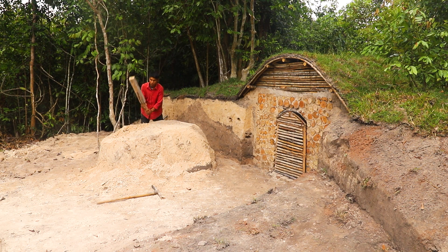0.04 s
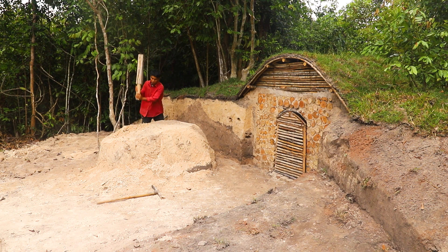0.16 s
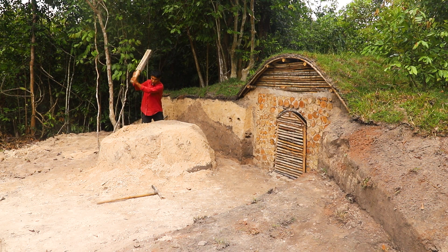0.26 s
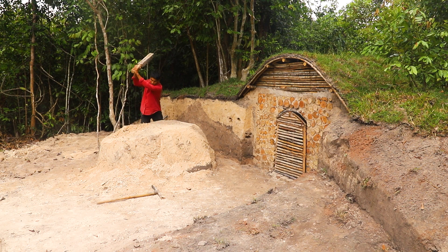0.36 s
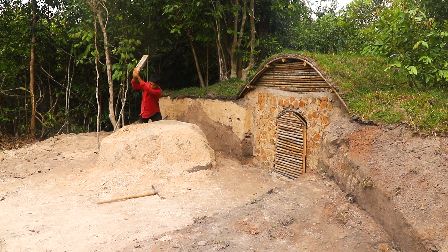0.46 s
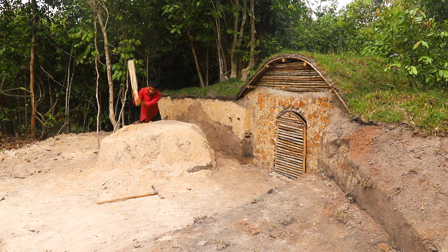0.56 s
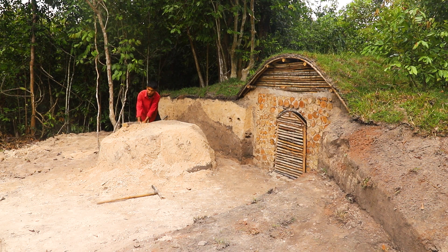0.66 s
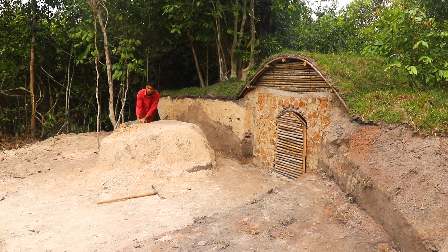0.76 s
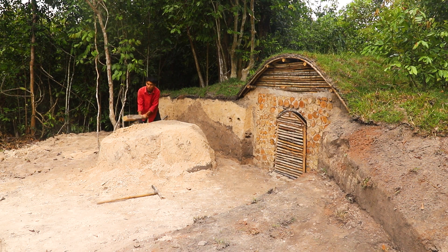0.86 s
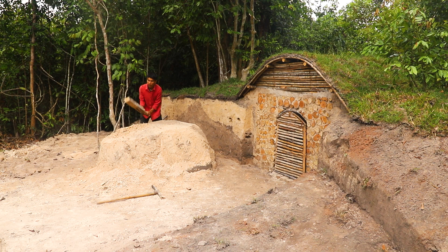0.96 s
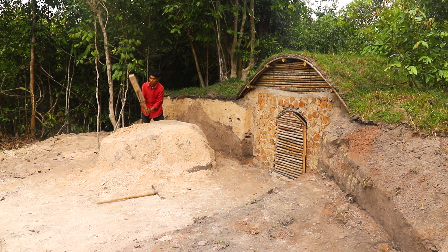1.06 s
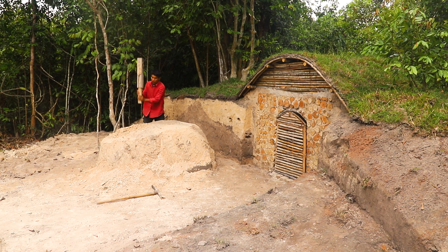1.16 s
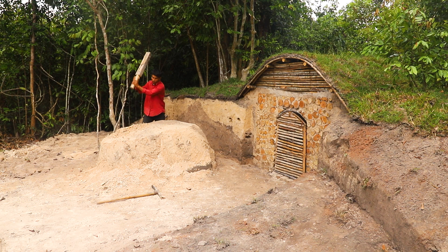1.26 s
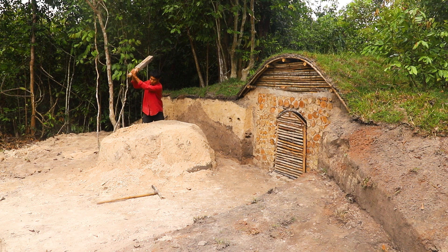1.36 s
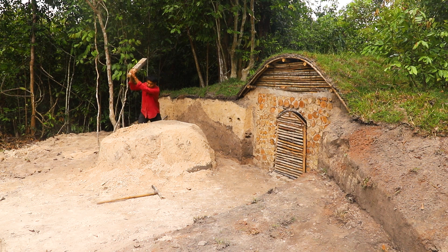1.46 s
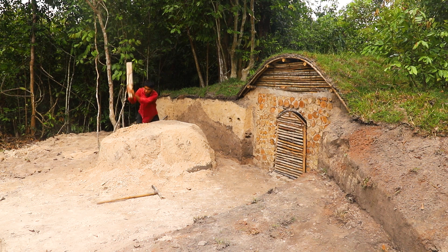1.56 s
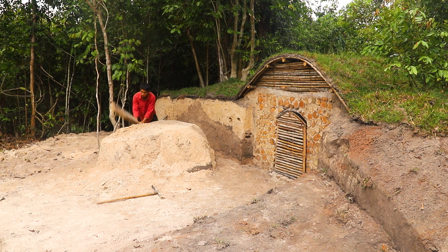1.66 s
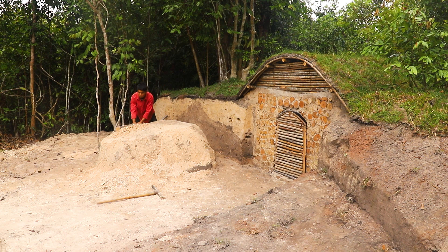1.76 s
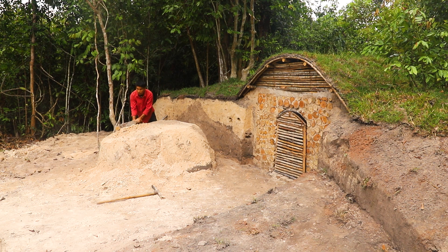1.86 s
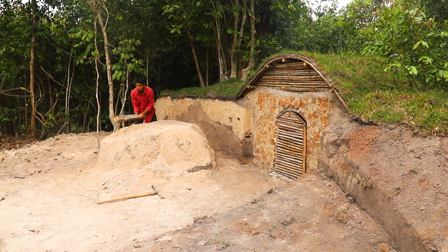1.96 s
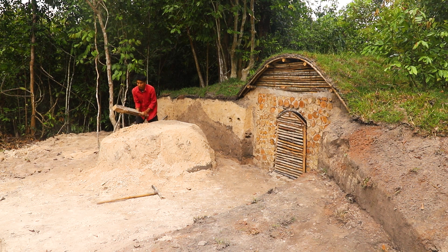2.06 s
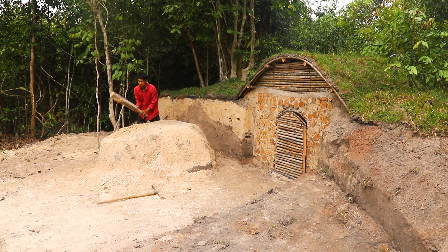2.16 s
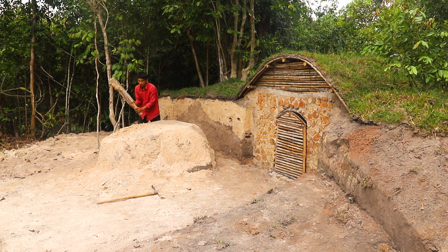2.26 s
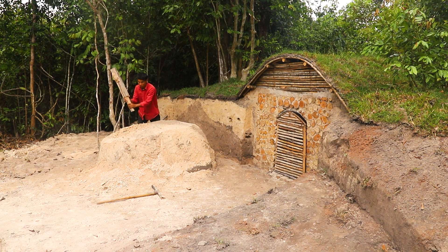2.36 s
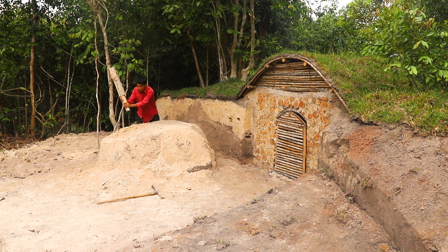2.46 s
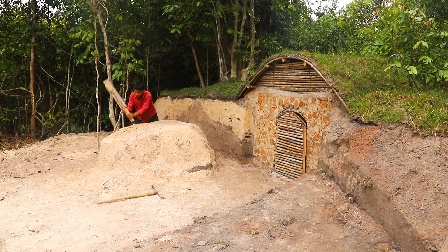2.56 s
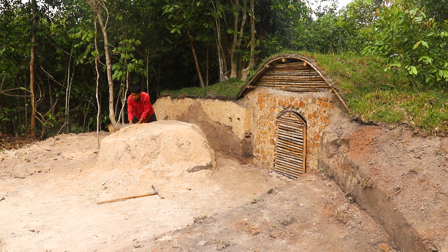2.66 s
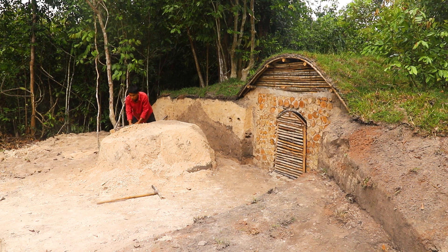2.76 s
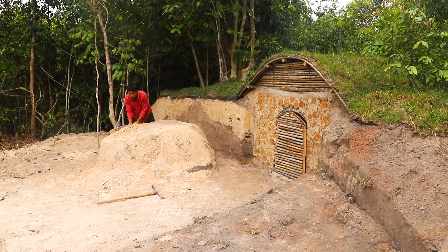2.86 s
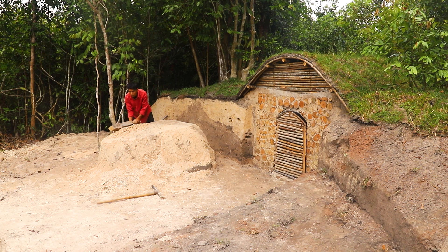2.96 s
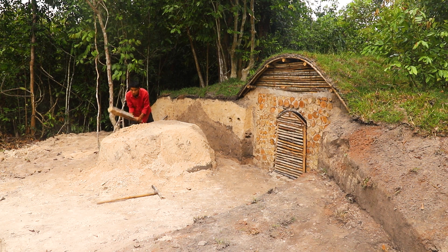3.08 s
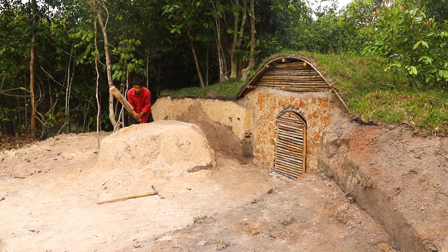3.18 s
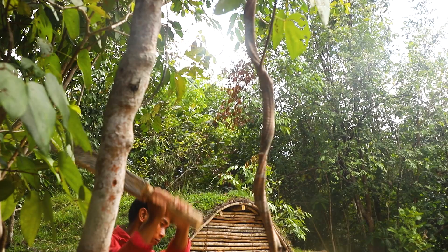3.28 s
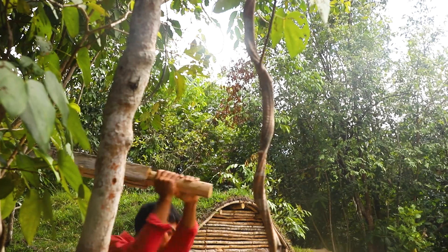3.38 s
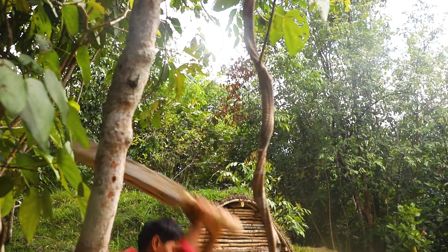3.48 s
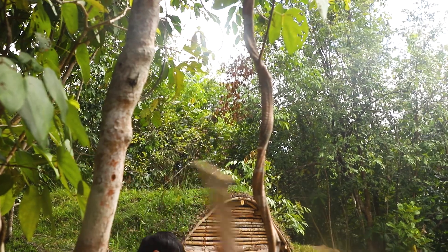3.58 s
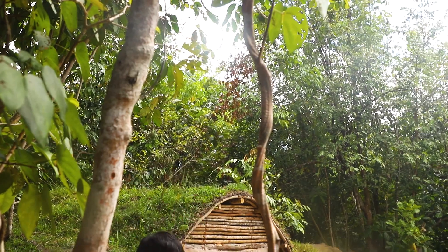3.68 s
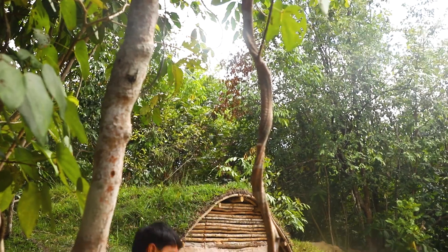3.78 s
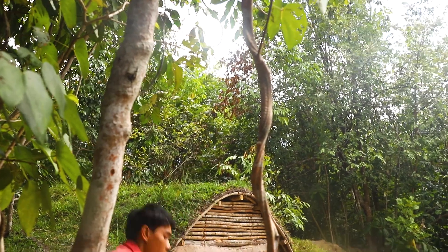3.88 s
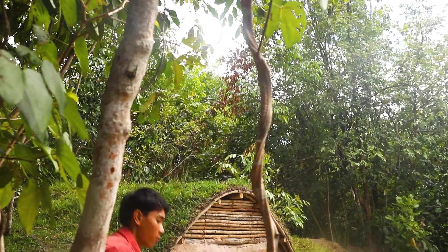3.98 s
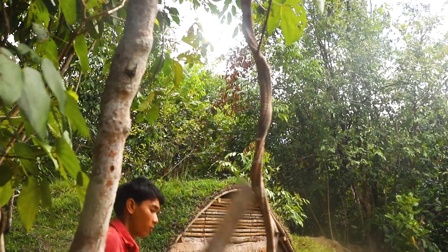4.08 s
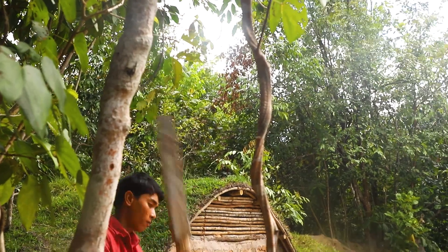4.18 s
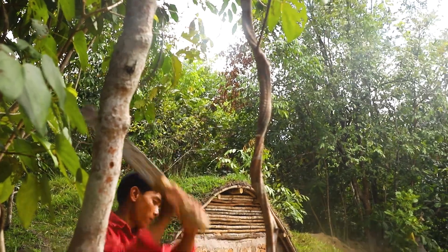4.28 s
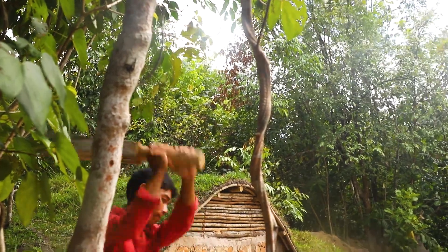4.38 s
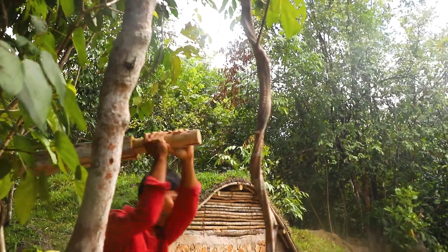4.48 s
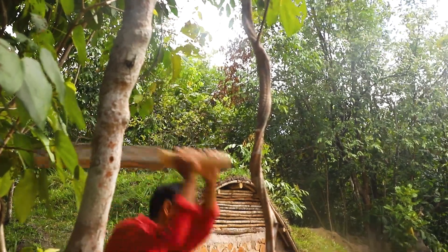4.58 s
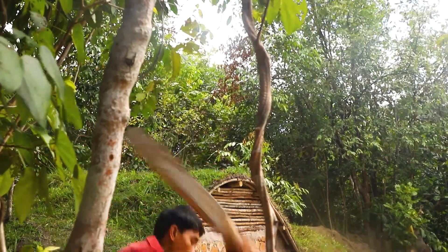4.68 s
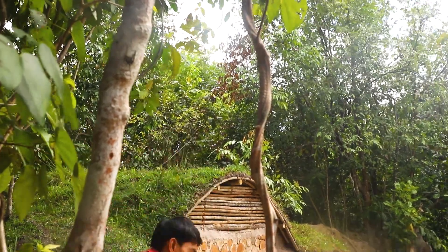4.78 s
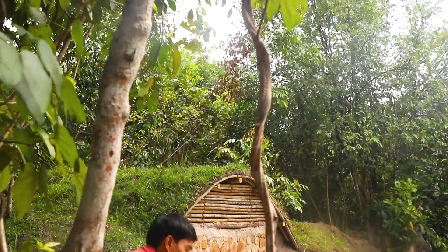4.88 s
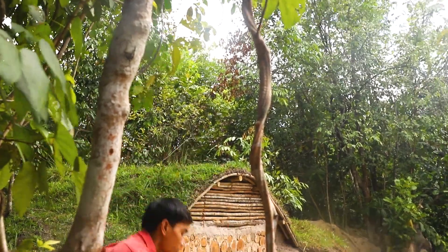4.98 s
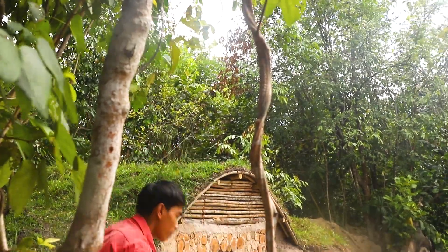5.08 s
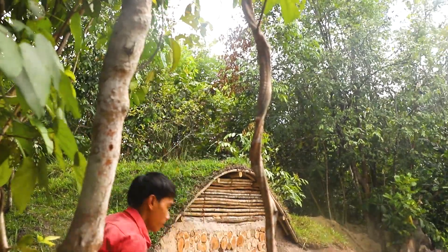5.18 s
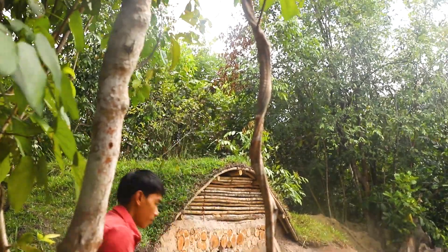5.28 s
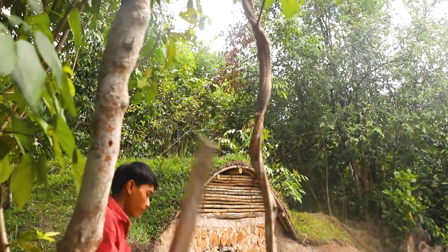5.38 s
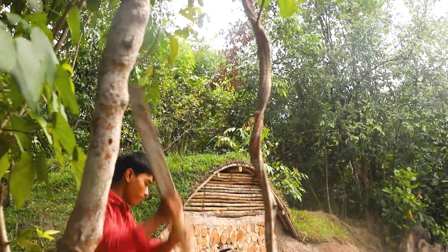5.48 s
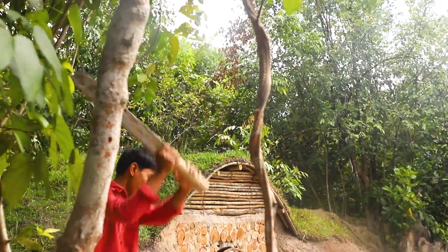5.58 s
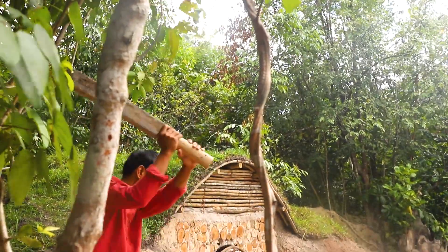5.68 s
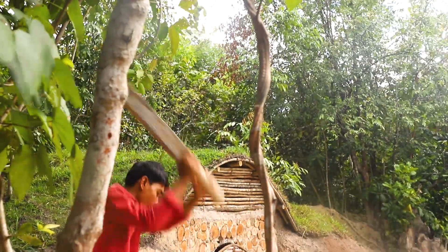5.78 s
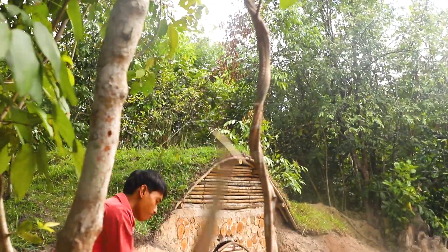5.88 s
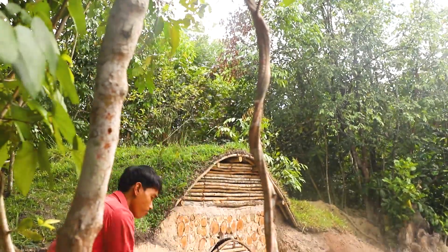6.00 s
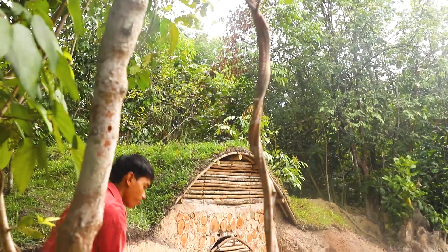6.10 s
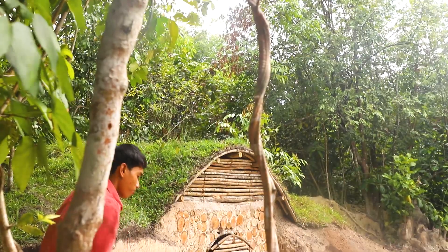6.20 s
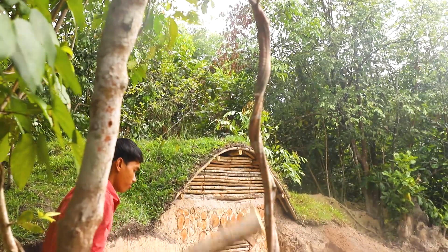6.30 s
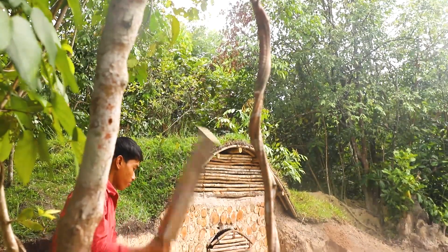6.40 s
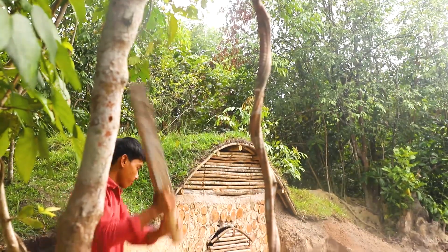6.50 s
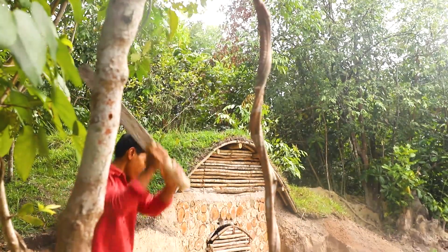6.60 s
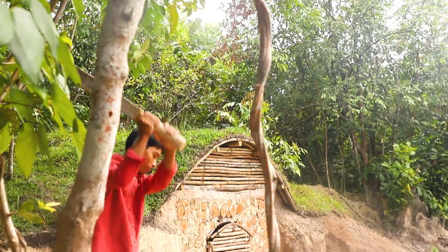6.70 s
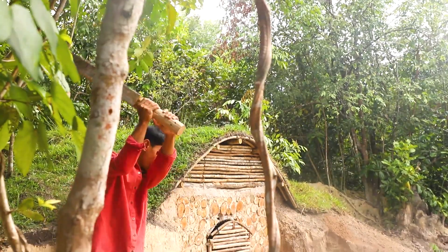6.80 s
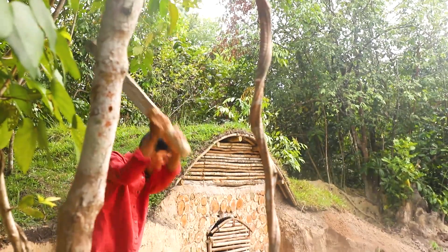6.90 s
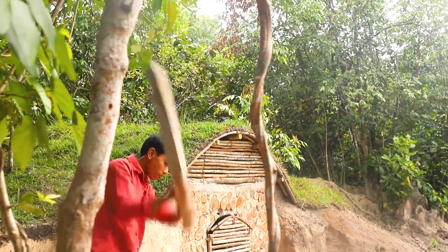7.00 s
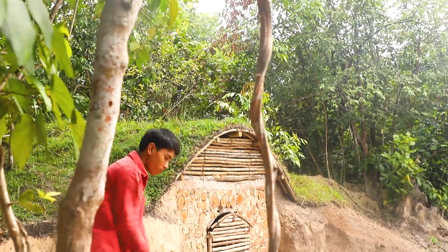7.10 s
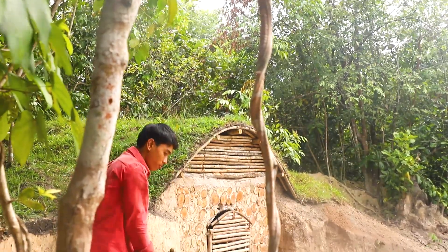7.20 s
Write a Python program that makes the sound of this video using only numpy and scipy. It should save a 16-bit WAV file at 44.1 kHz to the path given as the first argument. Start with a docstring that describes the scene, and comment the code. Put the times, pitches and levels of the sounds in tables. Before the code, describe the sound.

Steady manual pounding outdoors: dry wooden slaps on compacted soil, each a few milliseconds of hard contact with a low ground thud and brief diffuse echo. Three blows come from afar over very quiet foliage, getting softer; then four come from nearby, brighter and overloading the microphone. Leaves hiss slightly more, a faint high insect tone fades, tiny knocks and gritty scuffs appear, and wind bumps the microphone, mostly on the left.

```python
"""A forest clearing: a flat wooden pole slaps packed earth, heard first from afar, then from close by.
Each blow is a few ms of uneven contact that rings pole, earth and trapped air; loud blows overload.
Low noise bands make the thud of the ground, and decaying coloured noise the echoes off banks and trees.
Broadband noise makes hissing leaves and scuffed soil, narrow resonances a faint insect, rung bursts small knocks.
Low noise and short sine puffs are gusts of wind buffeting the two microphone ports."""
import sys
import numpy as np
from scipy import signal
from scipy.fft import rfft, irfft
from scipy.io import wavfile

SR = 44100
rng = np.random.default_rng(int(sys.argv[2]) if len(sys.argv) > 2 else 0)


def unload_audio(sound):
    """Save the sound as a 16-bit wav file, at the path given as the first command line argument."""
    columns = np.transpose(np.atleast_2d(sound))
    # keep every value between -1 and 1, then stretch to whole-number steps
    steps = np.round(np.clip(columns, -1, 1) * 32767)
    wavfile.write(sys.argv[1], SR, steps.astype(np.int16))


N = 319725
TIME_S = np.arange(N) / SR
BLOW_SIZE = SR // 2
BLOW_TIME_S = np.arange(BLOW_SIZE) / SR

# Leaf hiss spectra from the far and near standpoints, and high rustle: frequency_hz, density_db (per Hz)
FAR_LEAVES = [(15, -56.5), (25, -23), (53, -5), (76, -7), (92, -14.5), (154, -6), (311, -15.5), (442, -13),
              (739, -15.5), (1380, -19), (1710, -20.5), (12700, -31.5), (16200, -38)]
NEAR_LEAVES = [(15, -45), (25, -10), (43, -2.5), (80, -6.5), (180, 0.5), (256, -8.5), (326, -7),
               (476, -6.5), (695, -5.5), (1130, -9.5), (1230, -11.5), (2550, -12), (8590, -17),
               (14400, -23), (16000, -31)]
HIGH_RUSTLE = [(8000, -25), (11500, -6), (13500, -0.5), (16000, -3)]
# Left-right likeness of forest noise: frequency_hz, likeness (-1 opposite to 1 alike)
FOREST_LIKENESS = [(60, 0.72), (130, -0.23), (290, -0.24), (640, -0.3), (1410, 0.51), (3100, 0.36),
                   (6820, 0.52), (15000, -0.63)]
# Swells of the breeze: height_s, half_s (time to half the gain in dB), near_leaves_gain_db, rustle_gain_db
BREEZE_SWELLS = [(5.8, 1.6, 4, 5), (5.72, .12, 0.3, 9)]
# Gusts on the ports: peak_s, rms_db, rise_s and fall_s (per 20 dB), left_minus_right_db, top_hz
GUSTS = [(4.756, -40.5, 0.077, 0.095, 8, 179), (5.125, -44.5, 0.1, 0.098, 0.5, 180.5),
         (5.273, -46.5, 0.028, 0.068, -12, 231.3), (5.595, -31, 0.079, .15, 11, 173),
         (5.702, -22, 0.051, 0.036, 21, 251), (5.789, -34, 0.074, 0.015, 1, 283),
         (5.859, -35.5, .03, .12, 6, 340), (5.935, -30.5, 0.08, 0.037, 3.5, 348),
         (6.361, -51.5, 0.15, .1, 4, 180), (6.49, -40, 0.075, 0.086, 8.5, 190),
         (6.54, -35.5, 0.026, 0.067, 4, 185.4), (6.67, -34, .02, .3, 7.5, 200),
         (6.831, -42.5, .03, 0.16, 8, 200), (6.985, -29.5, .025, .15, -4, 197),
         (7.05, -34.5, 0.056, 0.085, 9, 437), (7.12, -39.5, 0.13, 0.1, 5, 396)]
# Single puffs: middle_s, peak_db, left_minus_right_db, pitch_hz
PUFFS = [(4.753, -36.5, 11, 94.3), (5.271, -42.5, -20, 160.3), (5.593, -20.5, 14.5, 138),
         (5.622, -24.5, 16, 164), (5.652, -41, 14, 275), (5.693, -19.5, 23, 151), (5.701, -18.5, 5, 70),
         (5.706, -19.5, 30, 375), (5.753, -22.5, 11.5, 286), (5.789, -33, 13, 347.5), (5.83, -32, -7, 322),
         (5.863, -31, 5, 230), (5.921, -46, 3, 393), (5.938, -26.5, 11, 219), (6.493, -27, 4, 140),
         (6.672, -23.5, 8, 169), (6.831, -27.5, 8, 173.3), (6.987, -24, -6.5, 190), (7.022, -22, 4.5, 248),
         (7.031, -29, 9, 486), (7.053, -25, 9, 422), (7.059, -23, 4, 184), (7.094, -22.5, 0, 198),
         (7.12, -21, 0.5, 155), (7.15, -24.5, 4, 253)]
# Scuffs on dry soil: peak_s, rms_db, fall_s (per 20 dB)
SCUFFS = [(3.38, -59, .3), (3.478, -59, .18), (6.39, -57, .03), (6.45, -65, .2)]
# Spectrum of the scuffs: frequency_hz, density_db (per Hz)
SCUFF_SPECTRUM = [(1000, -17), (3000, -7.5), (5000, -2), (8000, -8.5), (14000, -15.5)]
# Small ticks and knocks: start_s, peak_db, pitch_hz, burst_t60_s
TICKS = [(0.336, -50, 12000, .004), (1.07, -58.5, 12000, .004), (1.455, -52, 155, 0.17),
         (3.485, -51.5, 765, 0.22), (5.395, -47, 1585, 0.036), (5.879, -45, 7400, 0.0074),
         (5.939, -45.5, 1525, 0.049), (6.6337, -33.5, 2670, 0.015), (6.645, -49.5, 2820, 0.11)]
# Ground rumble bands: low_hz, high_hz, level_db (before tilt), silent_s (60 dB down after a 0 dB blow)
THUD_BANDS = [(35, 110, -12.5, 0.41), (55.5, 75, -5.5, 0.2063), (110, 220, -5, 0.28),
              (220, 610, -8.5, 0.2738)]
# Spectrum of echoes and crack before tilt: frequency_hz, density_db (per Hz)
ECHO_SPECTRUM = [(88, -27.5), (150, -0.5), (406, -5.5), (555, -7), (805, -8), (1360, -7), (1480, -5.5),
                 (1720, -7), (6140, -12), (13400, -31.5), (16000, -44.5)]
# Left-right likeness of the echoes and of the crack: frequency_hz, likeness (-1 to 1)
ECHO_LIKENESS = [(60, 1), (130, 0.5), (290, 0.091), (640, 1), (1410, -0.11), (3100, -0.32), (6820, -0.32),
                 (15000, 0.33)]
CRACK_LIKENESS = [(300, 0), (2000, 0), (5000, 0), (10000, 0)]
# Resonant modes of the pole: pitch_hz, level_db (relative to the other modes), t60_s
POLE_MODES = [(435, -9.5, 0.0014), (555, -9.5, 0.0031), (660, -6.5, 0.008), (1030, -12, 0.0048),
              (1300, -11.5, 0.011), (1600, -11, 0.0088), (1770, -9, 0.0079), (2150, -12.5, 0.0077),
              (2760, -12.5, 0.0034), (3700, -14.5, .004), (4720, -13, 0.0019), (6000, -19.5, 0.0043)]
# Blows: start_s, peak_db, slap_hz, pocket_db, edge_hz, edge_db, earth_hz, earth_db, contact_ms, crack_db,
# thud_db, thud_tilt_db (per octave), echo_db, echo_tilt_db (per octave);
# pocket, edge, earth and crack levels are relative to the peak
BLOWS = [(0.7634, -1.5, 1009, 4.5, 2270, -6.5, 229, 0, 5.52, -12.5, -30.5, 2.5, -35.5, 2),
         (1.7952, -10.5, 1100, -1, 2420, -4.5, 140, -1.5, 7.2, -21, -29, -3.5, -37, -0.2),
         (2.7792, -16.5, 1460, -12, 2380, -3.5, 191.2, 5.5, 6.7, -14, -30.5, -5, -45.5, -0.5),
         (3.7742, 3.5, 652.6, 2.5, 1550, -4.5, 268.4, -4, 4.45, -11.5, -30.5, -1, -28.5, 4.5),
         (4.9228, 4, 629, -2.8, 1340, 0, 267, -5.5, 4.8, -5.5, -32.5, 1.5, -29.5, 2.37),
         (6.057, 0.5, 1254, 5.5, 2800, 2, 308, -17, 2.5, -5, -41.5, 3.5, -30, 4.1),
         (7.2223, 3, 1456, 3.8, 2415, -0.1, 498, -1.5, 3.67, -6, -23.5, -2.5, -31, 0.4)]
# Deep bass taken out over time: time_s, share (0 to 1)
BASS_CUT = [(5.75, 0.05), (5.77, 0.74), (7.19, 0.92), (7.22, 0.14)]

MOVE_S = 3.35   # the standpoint changes from far to near
FAR_DB, NEAR_DB, RUSTLE_DB = -63.5, -59.5, -81.5   # near leaves and rustle before the breeze
INSECT_LOW_HZ, INSECT_HIGH_HZ, INSECT_WIDTH_HZ = 8660, 8670, 30
INSECT_DB, INSECT_FADE_DB_PER_S = -76, 2.5   # level at MOVE_S
PUFF_OVERTONE, PUFF_OVERTONE_DB = 1.8, -9   # pitch ratio, relative level
SCUFF_RISE_S = .03   # per 20 dB
TICK_OVERTONE, TICK_OVERTONE_DB = 1.73, -10   # pitch ratio, relative level
LEFT_LEAD_MS, LEFT_DB = .0227, 3.3   # the slap is earlier and louder on the left
THUD_SIDE_DB = -12   # side relative to mid
EARLY_DB, EARLY_T60_S, ECHO_BEND = 9, 0.13, 3.7   # early echoes relative to late ones; exponent of late decay
RETURN_DB = -29   # returning slap, relative to the air pocket
# A harder blow snaps more, is brighter, and is echoed and rumbles for longer: values for a 0 dB blow,
# and the strength in dB over which a quantity doubles
SNAP_DB, SNAP_DB_PER_DB = -16, 2.1
TOP_HZ, TOP_DOUBLES_DB = 8000, 13.5
REACH_S, REACH_DOUBLES_DB = .135, 15   # late echoes are 10 dB down at their reach
THUD_DOUBLES_DB = 44.5
LANDING_MS, LANDING_HALVES_DB = 1.2, 9   # a harder blow lands flat sooner
BASS_CUT_HZ, RUMBLE_CUT_HZ, CUTOFF_HZ = 170, 40, 16300


def from_db(db):
    """A level in decibels is twenty times the logarithm of gain."""
    return 10 ** (np.asarray(db) / 20)


def rms_one(x):
    """Equal mean power gives rms 1."""
    return x / np.sqrt(np.mean(x ** 2) + 1e-20)


def at_hz(points, hz):
    """Spectra interpolate linearly along logarithmic frequency."""
    frequencies, values = np.transpose(points)
    return np.interp(np.log(hz), np.log(frequencies), values)


def drift(rate_hz):
    """Critically damped low-pass filtering turns white noise into a slow random wander of spread 1."""
    step = 40   # samples between computed points
    r = np.exp(-2 * np.pi * rate_hz * step / SR)
    white = rng.standard_normal(N // step + 2002)
    slow = signal.lfilter([1], [1, -2 * r, r * r], white)[2000:]   # drop the filter's start
    return np.interp(np.arange(N) / step, np.arange(len(slow)), rms_one(slow))


def ring(clicks, hz, t60):
    """Damped resonance: a unit click starts a decaying sine of height 1."""
    r, w = from_db(-60 / (t60 * SR)), 2 * np.pi * hz / SR
    return signal.lfilter([0, np.sin(w)], [1, -2 * r * np.cos(w), r * r], clicks + 1e-18)


def coloured(spectrum, likeness, size=N, tilt_db=0):
    """Spectral shaping and partial coherence: stereo noise of rms 1, tilted per octave about 1 kHz."""
    hz = np.maximum(np.fft.rfftfreq(size, 1 / SR), 10)
    mid, side = rfft(rng.standard_normal((2, size)))
    alike = np.clip(at_hz(likeness, hz), -1, 1)
    pair = np.sqrt(1 + alike) * mid + np.sqrt(1 - alike) * side * [[1], [-1]]
    level_db = at_hz(spectrum, hz) + tilt_db * np.log2(hz / 1000)
    return rms_one(irfft(pair * from_db(level_db), size))


def sides(pan_db):
    """Level difference between channels places a sound; the two gains average 1."""
    gains = from_db(np.array([pan_db / 2, -pan_db / 2]))
    return 2 * gains / gains.sum(axis=0)


def swell(s, rise_s, fall_s):
    """Exponential growth and decay: gain 1 at s, 20 dB lower one rise before and one fall after."""
    late = TIME_S - s
    return from_db(20 * np.minimum(late / rise_s, -late / fall_s))


def insect():
    """Narrow-band resonance: noise through two close bands becomes a wavering tone that fades."""
    tone = 0
    for hz in (INSECT_LOW_HZ, INSECT_HIGH_HZ):
        edges = [hz - INSECT_WIDTH_HZ / 2, hz + INSECT_WIDTH_HZ / 2]
        band = signal.butter(2, edges, "band", fs=SR, output="sos")
        tone = tone + signal.sosfilt(band, rng.standard_normal((2, N)))
    return from_db(INSECT_DB - INSECT_FADE_DB_PER_S * (TIME_S - MOVE_S)) * rms_one(tone)


def forest():
    """Broadband noise of slowly wandering level is leaf hiss; rustle and insect sound only from nearby."""
    close = TIME_S >= MOVE_S
    leaves_db, rustle_db = 0, 0
    for height_s, half_s, leaves_gain_db, rustle_gain_db in BREEZE_SWELLS:
        bell = .5 ** ((TIME_S - height_s) / half_s) ** 2
        leaves_db = leaves_db + leaves_gain_db * bell
        rustle_db = rustle_db + rustle_gain_db * bell
    near = from_db(NEAR_DB + leaves_db) * coloured(NEAR_LEAVES, FOREST_LIKENESS)
    far = from_db(FAR_DB) * coloured(FAR_LEAVES, FOREST_LIKENESS)
    leaves = np.where(close, near, far)
    rustle = from_db(RUSTLE_DB + rustle_db) * coloured(HIGH_RUSTLE, FOREST_LIKENESS)
    return from_db(0.46 * drift(2.1)) * leaves + close * (rustle + insect())


def gusts():
    """Turbulent pressure at a port is lumpy low-passed noise, only partly shared with the other port."""
    out = np.zeros((2, N))
    white = rng.standard_normal((2, N)) + 0.76 * rng.standard_normal(N)
    lumps = from_db(3.8 * drift(28) + 0.6 * np.array([drift(25), drift(25)]))
    for s, db, rise_s, fall_s, pan_db, top_hz in GUSTS:
        low = rms_one(signal.sosfilt(signal.butter(5, top_hz, fs=SR, output="sos"), white))
        out += from_db(db) * swell(s, rise_s, fall_s) * sides(pan_db)[:, None] * lumps * low
    return out


def puffs():
    """A brief pressure pulse is a sine of a cycle or two under a Gaussian envelope."""
    out = np.zeros((2, N + SR))
    t = np.arange(-SR // 20, SR // 20) / SR
    for s, peak_db, pan_db, hz in PUFFS:
        shape = np.exp(-(t * hz / 0.79) ** 2)
        turns = hz * t + rng.random() + rng.normal(0, 0.11, (2, 1))   # phase differs between ports
        overtone = shape ** 2.4 * np.sin(2 * np.pi * PUFF_OVERTONE * turns)
        puff = shape * np.sin(2 * np.pi * turns) + from_db(PUFF_OVERTONE_DB) * overtone
        start = round(s * SR) - SR // 20
        out[:, start:start + len(t)] += from_db(peak_db) * sides(pan_db)[:, None] * puff
    return out[:, :N]


def wind():
    """Turbulence at the ports superposes sustained gusts and single puffs."""
    return gusts() + puffs()


def scuffing():
    """Granular friction: feet and pole on dry soil make a gritty hiss of uneven level."""
    level = sum(from_db(db) * swell(s, SCUFF_RISE_S, fall_s) for s, db, fall_s in SCUFFS)
    grit = from_db(2.5 * drift(60))
    return level * grit * coloured(SCUFF_SPECTRUM, FOREST_LIKENESS)


def ticks():
    """Impulsive excitation: a decaying noise burst rings a resonance and its overtone."""
    out = np.zeros(N + SR)
    size = SR // 4
    for s, peak_db, hz, t60 in TICKS:
        burst = rng.standard_normal(size) * from_db(-60 * np.arange(size) / SR / t60)
        high = ring(burst, min(TICK_OVERTONE * hz, SR / 3), 7.4 / hz)
        low = ring(burst, hz, 8.5 / hz + t60 / 6)
        tick = rms_one(low) + from_db(TICK_OVERTONE_DB) * rms_one(high)
        start = round(s * SR)
        out[start:start + size] += from_db(peak_db) * tick / np.abs(tick).max()
    return out[:N]


def thud(t, tilt_db):
    """Frequency-dependent damping: the ground rumbles, holds, then falls silent, its deepest band last."""
    out = 0
    for low_hz, high_hz, db, t60 in THUD_BANDS:
        band = signal.butter(2, [low_hz, high_hz], "band", fs=SR, output="sos")
        noise = signal.sosfilt(band, rng.standard_normal((2, 2 * len(t))))
        mid, side = rms_one(noise[:, len(t):])   # drop the filter's start
        tilted_db = db + tilt_db * np.log2(high_hz / 150)
        stereo = mid + from_db(THUD_SIDE_DB) * side * [[1], [-1]]
        out = out + from_db(tilted_db - 60 * (t / t60) ** 1.8) * stereo
    return out


def tree_echoes(peak_db, echo_db, tilt_db):
    """Diffuse reflection: nearby banks answer first, trees all round up to the clearing's reach."""
    t = BLOW_TIME_S
    reach_s = REACH_S * 2 ** (peak_db / REACH_DOUBLES_DB)
    early = from_db(EARLY_DB - 60 * t / EARLY_T60_S)
    late = from_db(-10 * (t / reach_s) ** ECHO_BEND)
    noise = coloured(ECHO_SPECTRUM, ECHO_LIKENESS, BLOW_SIZE, tilt_db)
    echoes = from_db(echo_db) * (early + late) * noise
    dull = signal.lfilter(*signal.butter(1, 5000, fs=SR), echoes)
    # leaves and air take the treble of late echoes
    return dull + from_db(-60 * t / 0.41) * (echoes - dull)


def slap_returns(peak_db, slap_hz, pocket_db):
    """Reflection keeps pitch: the nearest banks send back noise resonating at the slap pitch."""
    noise = rms_one(ring(rng.standard_normal(BLOW_SIZE), slap_hz, 0.03))
    return noise * from_db(peak_db + pocket_db + RETURN_DB - 60 * BLOW_TIME_S / .15)


def contact(peak_db, contact_ms):
    """Progressive contact: the flat face lands bit by bit in random knocks of total energy 1."""
    release = np.clip((contact_ms / 1000 - BLOW_TIME_S) / 0.0017, 0, 1)
    landing_s = LANDING_MS / 1000 / 2 ** (peak_db / LANDING_HALVES_DB)
    touching = release * np.clip(0.21 + BLOW_TIME_S / landing_s, 0, 1)
    struck = rng.random(BLOW_SIZE) < 5000 / SR   # about 5000 knocks a second
    knocks = touching * rng.standard_normal(BLOW_SIZE) * struck
    return touching, knocks / np.sqrt(np.sum(knocks ** 2))


def air_pocket(touching, knocks, slap_hz):
    """Cavity resonance: air squeezed under the face pulses unevenly at the slap pitch during contact."""
    pace = 1 + 0.57 * ring(knocks, 300, 0.023)
    pulses = touching * np.sin(2 * np.pi * slap_hz * np.cumsum(pace) / SR)
    pocket = ring(pulses, slap_hz, 4.0 / slap_hz)
    return pocket / np.abs(pocket).max()


def pole(knocks, edge_hz, edge_db):
    """Modal vibration: the knocks ring each mode of the wood, and its edge."""
    modes = list(POLE_MODES) + [(edge_hz, edge_db, .007)]
    return sum(from_db(db + 4.5) * ring(knocks, hz, t60) for hz, db, t60 in modes)


def packed_earth(earth_hz, earth_db):
    """Heavily damped resonance: the struck earth gives a short low sine."""
    t = BLOW_TIME_S
    onset = np.clip(t * earth_hz / 0.17, 0, 1)
    tone = np.sin(2 * np.pi * earth_hz * t) * from_db(earth_db - 8.7 * earth_hz * t) * onset
    return signal.lfilter(*signal.butter(2, earth_hz / 2.5, "high", fs=SR), tone)


def blow(peak_db, slap_hz, pocket_db, edge_hz, edge_db, earth_hz, earth_db, contact_ms, crack_db,
         thud_db, thud_tilt_db, echo_db, echo_tilt_db):
    """Impact excitation: one contact drives pole, earth and air, followed by ground rumble and echoes."""
    t = BLOW_TIME_S
    touching, knocks = contact(peak_db, contact_ms)
    pocket = from_db(pocket_db) * air_pocket(touching, knocks, slap_hz)
    top_hz = min(TOP_HZ * 2 ** (peak_db / TOP_DOUBLES_DB), SR / 3)
    soft = signal.butter(2, top_hz, fs=SR)   # a weaker blow is duller
    wood = signal.lfilter(*soft, pole(knocks, edge_hz, edge_db))
    # the leading edge strikes first: a snap of bright noise
    snap_db = SNAP_DB + SNAP_DB_PER_DB * peak_db - 60 * t / .008
    snap = from_db(snap_db) * np.diff(rng.standard_normal(BLOW_SIZE + 1))
    slap = pocket + wood + packed_earth(earth_hz, earth_db) + snap
    slap = np.array([np.interp(t - lag_ms / 1000, t, slap, 0) for lag_ms in (0, LEFT_LEAD_MS)])
    crack = coloured(ECHO_SPECTRUM, CRACK_LIKENESS, BLOW_SIZE, echo_tilt_db - 2.0)
    crack = signal.lfilter(*soft, crack) * from_db(crack_db - 60 * t / 0.042)
    direct = from_db(peak_db) * (slap * sides(LEFT_DB)[:, None] + crack)
    rumble = from_db(thud_db) * thud(t / 2 ** (peak_db / THUD_DOUBLES_DB), thud_tilt_db)
    tails = tree_echoes(peak_db, echo_db, echo_tilt_db) + slap_returns(peak_db, slap_hz, pocket_db) + rumble
    uneven = from_db(2.0 * drift(60)[:BLOW_SIZE])   # a slow random wander makes the tail uneven
    return direct + np.clip(t / .004, 0, 1) * uneven * tails


def pounding():
    """Superposition in time: each blow is added at its own start."""
    out = np.zeros((2, N + SR))
    for s, *how in BLOWS:
        start = round(s * SR)
        out[:, start:start + BLOW_SIZE] += blow(*how)
    return out[:, :N]


def scene():
    """Superposition: the pressures of all sources add at the two ports."""
    return forest() + wind() + scuffing() + ticks() + pounding()


def record(dry):
    """Overload and band-limiting: bass thins at set times, loud peaks are cut flat, both ends are filtered."""
    thin = signal.sosfilt(signal.butter(3, BASS_CUT_HZ, "high", fs=SR, output="sos"), dry)
    cut_s, cut_share = np.transpose(BASS_CUT)
    share = np.interp(TIME_S, cut_s, cut_share, 0, 0)
    flat = np.clip(share * thin + (1 - share) * dry, -1, 1)
    flat = signal.sosfilt(signal.butter(2, RUMBLE_CUT_HZ, "high", fs=SR, output="sos"), flat)
    top_cut = signal.cheby2(20, 50, CUTOFF_HZ, fs=SR, output="sos")
    return np.clip(signal.sosfilt(top_cut, flat), -1, 1)


dry = scene()
out = record(dry)
unload_audio(out)
```